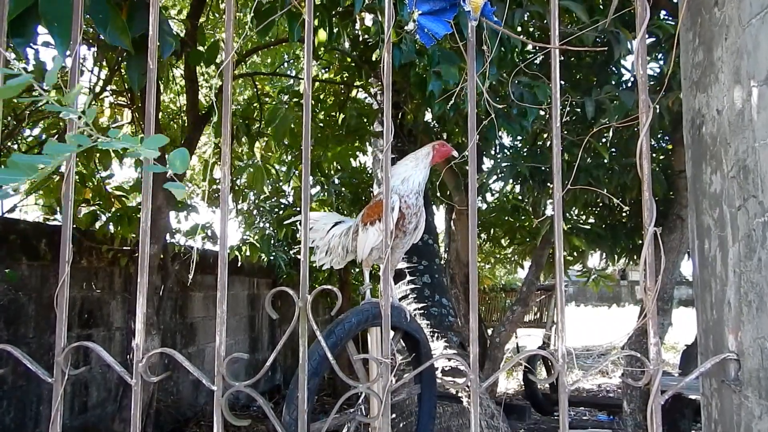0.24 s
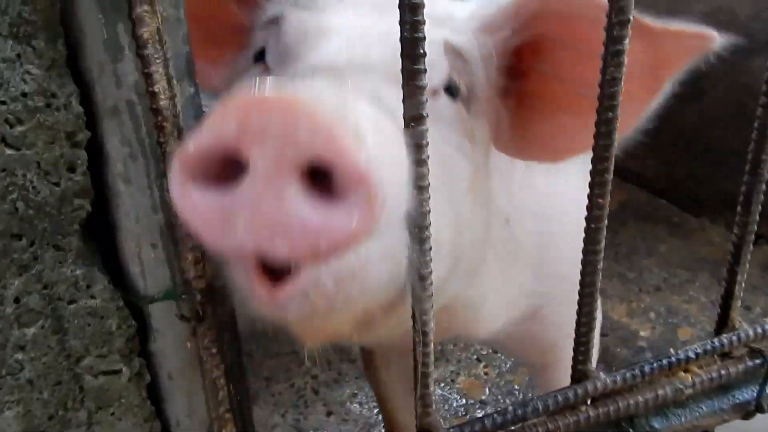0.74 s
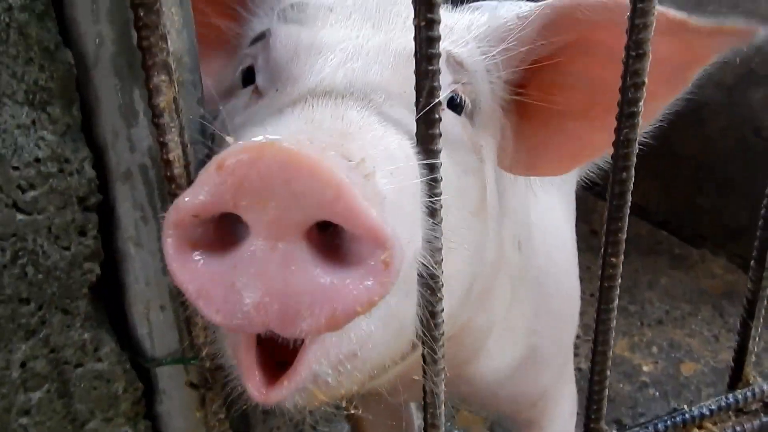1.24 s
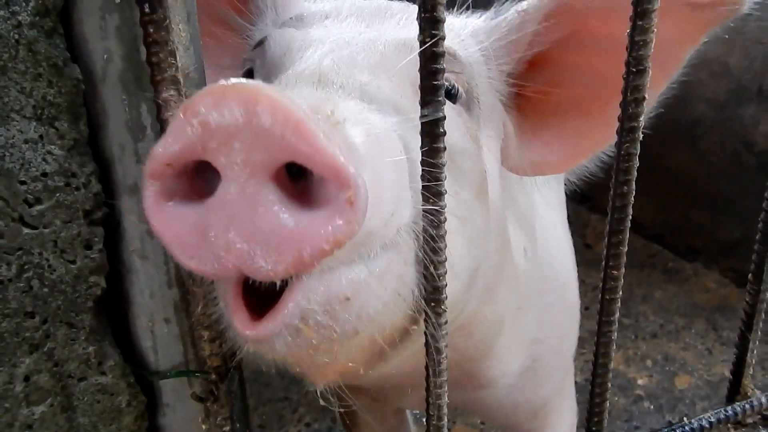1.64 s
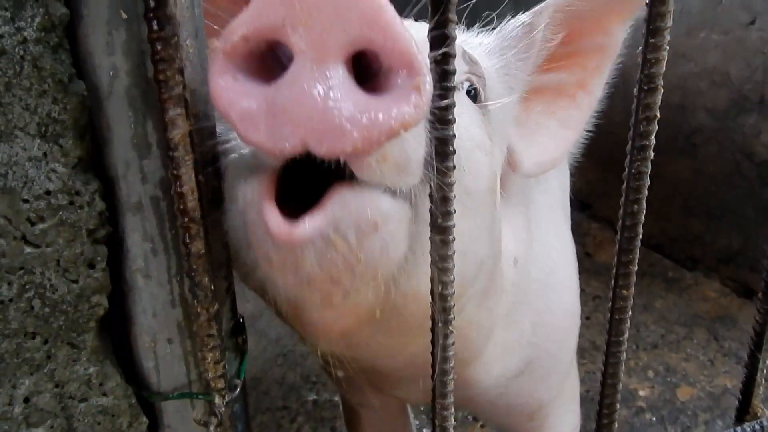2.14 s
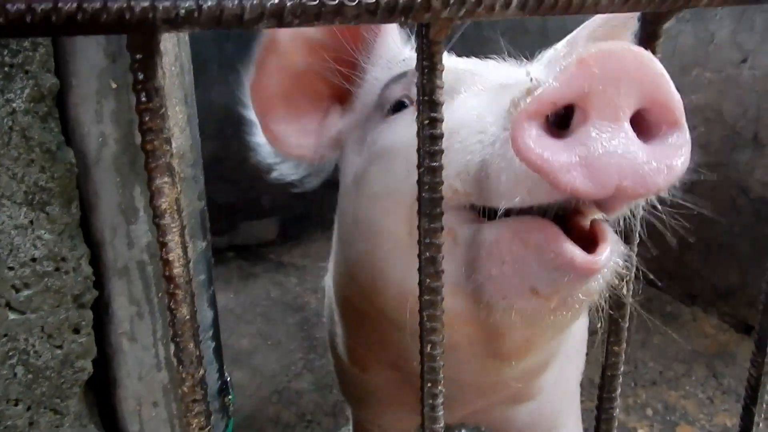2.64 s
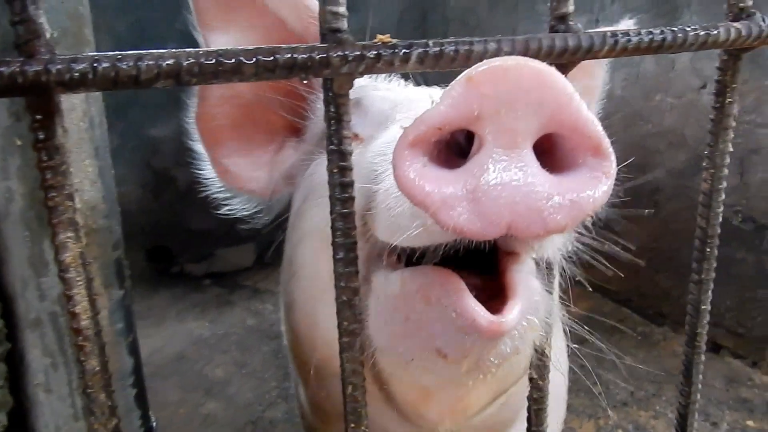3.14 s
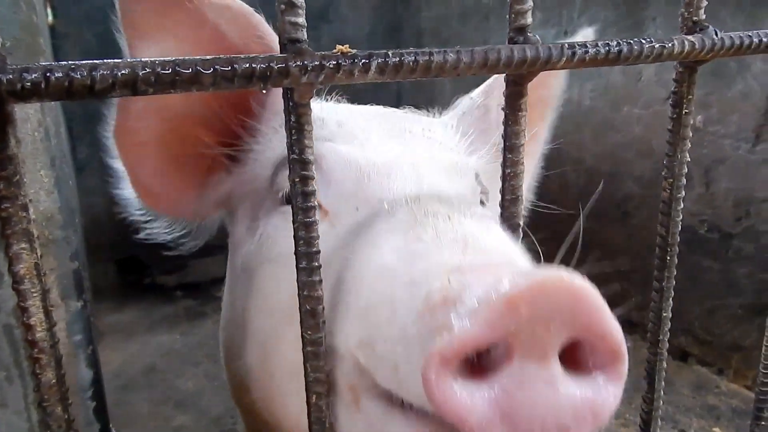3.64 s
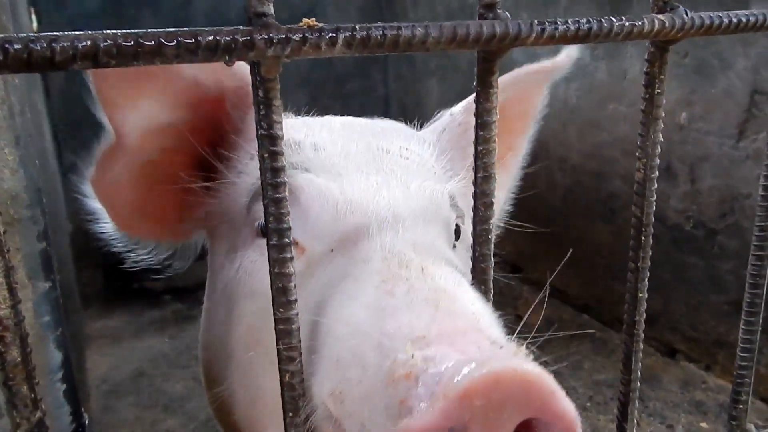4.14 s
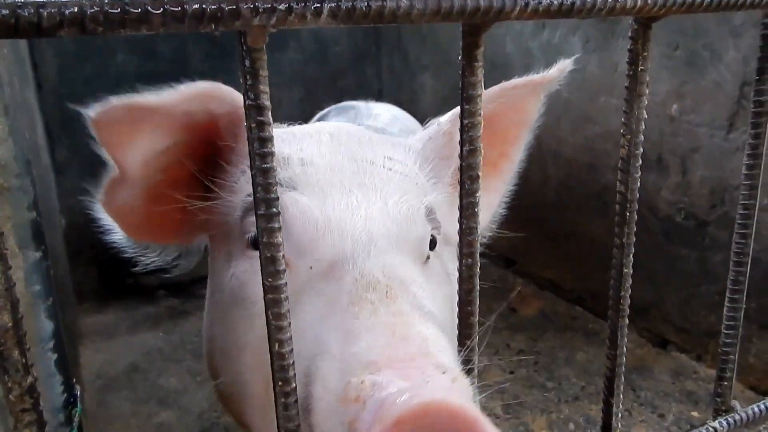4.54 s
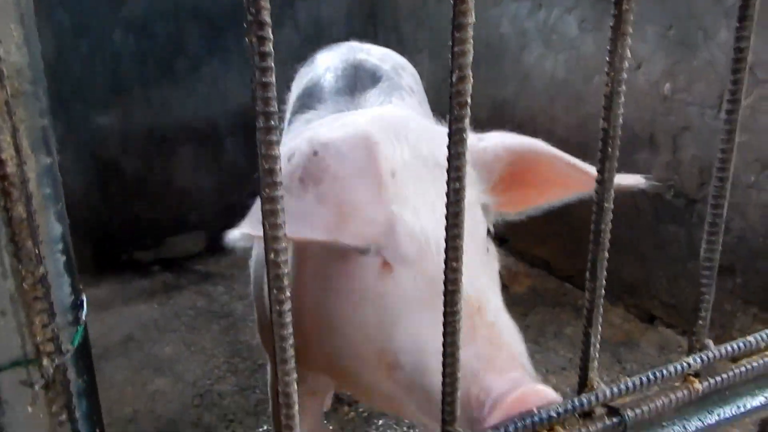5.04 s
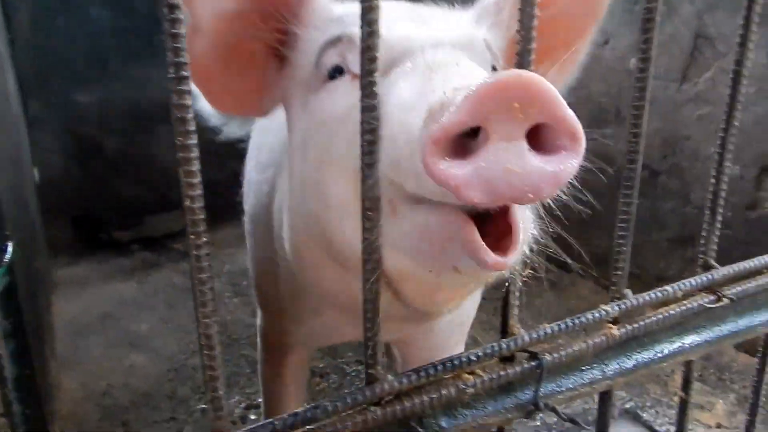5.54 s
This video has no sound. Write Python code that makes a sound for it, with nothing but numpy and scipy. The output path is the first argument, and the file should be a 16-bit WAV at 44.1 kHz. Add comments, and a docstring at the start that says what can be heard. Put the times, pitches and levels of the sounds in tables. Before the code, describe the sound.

A rooster's last held note cracks and stops; abruptly a nearby pig gives a dozen rough, low grunts with wet snuffles in a concrete pen.

```python
"""First, in a yard, the end of a rooster's crow: a sagging harmonic tone that roughens and breaks off. After a
cut, a pig grunts close by in a concrete pen: throat pulses excite resonances of mouth and snout. Most grunts
swell out of a murmur through the snout; then the mouth opens, the push sags, the pulses slow. Between grunts
the pig snuffles, a flutter chopping a hiss; now and then a sharp click or a gulp is heard. Both places add
sparse decaying reflections and a bed of filtered noise."""
import sys
import numpy as np
from scipy import signal
from scipy.fft import rfft, irfft
from scipy.io import wavfile

SR = 44100
rng = np.random.default_rng(int(sys.argv[2]) if len(sys.argv) > 2 else 0)


def output_pcm(signal):
    """Save a mono or channel-first signal as 16-bit PCM at the path in sys.argv[1].

    Samples are clipped to [-1, 1] before scaling.
    """
    pcm = np.clip(np.atleast_2d(signal).T, -1, 1) * 32767
    wavfile.write(sys.argv[1], SR, np.round(pcm).astype(np.int16))


N = 254898
T = np.arange(N) / SR

# grunts: start t/s, hold/s, release/s, effort level/dB, softness of the start/dB, sag over the hold/dB,
# slack in mid-grunt/dB, pulse rate at full effort f/Hz, mouth opening time/s, widest opening (0-1),
# relative brightness/dB, relative rasp/dB
GRUNT_ROWS = [(0.628, .12, .085, -14, 3.5, 10.5, 0.5, 84.5, 0.15, 0.95, -1, -28),
              (.9645, 0.085, 0.067, -15, 4, 11.5, -1, 71, 0.081, 0.88, -1.5, -24.5),
              (1.277, 0.16, .06, -16.5, 3.5, 12, 0.5, 73, 0.042, 0.98, -2.5, -23),
              (1.7086, 0.33, 0.063, -17.5, 8.5, 10.5, 3.5, 72, .12, 0.86, -3.5, -24.5),
              (2.25, .11, .085, -16.5, 6, 8.5, -1, 63, 0.096, 1, -0.5, -21.5),
              (2.67, 0.25, 0.089, -18.5, 10, 7.5, 9, 83.5, 0.056, 0.83, -0.5, -20.5),
              (3.1504, 0.17, .055, -17.5, 8.5, 13, -0.5, 81.6, 0.037, .85, 0.5, -20.5),
              (3.579, .32, 0.042, -19.5, 9, 6, 7, 72, 0.054, 0.89, -1, -24.5),
              (4.139, .26, .055, -21.5, 1, 11.5, 0, 77.75, 0.055, 0.91, 2.5, -23.5),
              (4.658, .3, .06, -23, 5, 5, 6.5, 68, .22, 0.9, 1.5, -22.5),
              (5.37, 0.042, 0.075, -25.5, 0.5, 5, 0, 75.5, 0.054, 0.78, 11, -10.5),
              (5.68, 0.079, 0.088, -20.5, 1.5, 8, -0.5, 79, 0.056, 0.97, 6.5, -19.5)]
# murmurs, mouth nearly shut: start t/s, end t/s, effort level at the end/dB, swell/dB, pulse rate f/Hz,
# relative brightness/dB, relative rasp/dB
MURMUR_ROWS = [(0.612, 0.618, -27.5, -4.5, 62, -17, -26), (0.881, 0.964, -31, 5.5, 50, -8, -21),
               (1.199, 1.255, -31, 3, 57, -7.5, -25), (1.65, 1.702, -28, 10.5, 52, -22, -31),
               (2.169, 2.229, -34.5, -3, 43, -12, -17.5), (2.468, 2.533, -38, -6, 41.6, -10.5, -23.5),
               (2.574, 2.657, -29, 3, 39.3, -8, -32), (3.024, 3.125, -31, 11.5, 41.6, -6, -23),
               (3.56, 3.58, -36.5, -1, 41, -13, -22), (3.974, 4.118, -29, 6, 43, -6.5, -27),
               (4.592, 4.662, -28, 10.5, 59, -21, -45), (4.988, 5.171, -29, 2, 41.2, -11, -23.5),
               (5.261, 5.282, -33, 8.5, 48, -8, -25.5), (5.3, 5.368, -32.5, -7, 72, -10, -28.5),
               (5.554, 5.673, -26.5, 9, 64, -16.5, -30)]
# jolts, where the folds catch and let go with one hard slap: t/s, level over the effort/dB
JOLT_ROWS = [(.923, 8), (1.865, 3.5), (1.901, 3.5), (1.975, 6.5), (2.008, 2.5), (2.725, 5.5), (3.774, 6.5),
             (3.84, 6), (4.114, 5), (4.238, 5), (4.341, 8), (4.75, 5), (4.899, 7.5), (5.735, 4)]
# mouth resonances: f nearly shut/Hz, f wide open/Hz, width/Hz, relative level/dB
MOUTH_MODES = [(265, 463.5, 71.7, -1), (705, 984, 52.7, 0.5), (1180, 1606, 188, -2.5), (1326, 1750, 77, 3),
               (1816, 2327, 114, -2), (2830, 2845, 133, -7.5), (3420, 3710, 170, -14)]
# snout resonances: f/Hz, width/Hz, relative level/dB
SNOUT_MODES = [(234, 21.4, 7), (524.5, 54, 6.5), (828.6, 20.3, 9), (1186, 7.7, -7.5), (1628, 44, 0.5),
               (2063, 91, 3), (2850, 38, -0.5)]
# chest resonance: f/Hz, width/Hz, level over the mean effort/dB
CHEST_MODE = (206, 356, -5.5)
# spectrum of the rasp: f/Hz, gain/dB
RASP_SPECTRUM = [(2500, -31), (3600, -7.5), (4800, 7.5), (5800, 13), (6700, 12.5), (7800, 0)]
# muffling of the pig's voice, a hollow in the middle and little top: f/Hz, gain/dB
MUFFLING = [(2330, -1.5), (2500, -13), (2680, -3), (7400, -1.5), (8300, -1.5), (9300, -18.5), (11000, -31),
            (15000, -38)]
# snuffles: start t/s, end t/s, hiss level/dB, flutter level/dB (both before muffling)
SNUFFLE_ROWS = [(0.84, 0.952, -42, -46), (1.123, 1.245, -35, -43), (1.518, 1.619, -52, -47.5),
                (2.095, 2.222, -43, -51.5), (3.013, 3.142, -41, -48.5), (3.402, 3.541, -48.5, -47),
                (4.035, 4.113, -41, -36), (4.475, 4.612, -55, -49)]
# spectrum of the nostril hiss: f/Hz, relative gain/dB
NOSTRIL_SPECTRUM = [(500, 9.5), (1300, 0), (1850, 13.5), (2400, -1), (3000, 7.5), (4200, -14.5), (5500, -1),
                    (6700, 7), (8000, -11.5), (9500, -11.5)]
# throaty gulps that end a grunt: t/s, relative level/dB
GULP_ROWS = [(2.065, -17), (5.135, -14)]
# sharp wide-band clicks, stronger on the left: t/s, relative level/dB
SNAP_ROWS = [(.982, 1), (0.997, -2), (2.365, -33), (2.751, -30.5), (5.419, -26)]
# the pig swings its head to the right: t/s, left-right level/dB
HEAD_TURN = [(2.2, 0.04), (2.7, -0.33)]
# the pig at the two ports, phase: f/Hz, lead of the left/rad
PIG_PHASE = [(3800, 0.053), (6300, 0.55), (8000, 1.4)]
# the pig at the two ports, balance: f/Hz, left-right level/dB
PIG_BALANCE = [(60, 2), (300, 1.76), (900, 1.64), (1530, 0.9), (2620, 1), (4500, 1.2), (7720, 3)]
# crow: t/s, pitch f/Hz, fundamental level/dB, octave level/dB, fourth harmonic level/dB,
# high overtones level/dB
CROW_TRACK = [(0, 859, -23, -16, -31.5, -25.5), (0.112, 848, -19.5, -15, -35.5, -28.5),
              (0.199, 836.5, -19.5, -19.5, -34.5, -30), (.245, 832, -18.5, -16, -27.5, -39.5),
              (0.299, 821.7, -18, -15, -47.5, -27.5), (0.36, 808.4, -16, -22.5, -48, -29),
              (0.387, 772, -18, -19, -52, -38)]
# where the crow breaks off: start t/s, silent t/s, share the pitch falls to
CROW_BREAK = (.376, 0.408, 0.71)
# high overtones of the crow: multiple of the pitch, relative level/dB
CROW_OVERTONES = [(3, -12.5), (5, -23), (6, -37), (7, 2.5), (8, 0.5), (9, -9.5), (10, -21.5), (11, -39),
                  (13, -41.5), (15, -43)]
# the rooster at the two ports: f/Hz, lead of the left/rad
ROOSTER_PHASE = [(4300, 0.13), (7900, 0.84)]
# reverberation, before each place scales it: f/Hz, 60 dB decay time/s
DECAY_TIMES = [(150, 0.72), (800, 0.24), (2500, 0.12), (8000, 0.14)]
# spectrum of the yard background: f/Hz, relative gain/dB
YARD_AIR = [(18, -57), (30, -14), (86, -2), (328, -11), (500, -18), (1620, -9), (2530, -25), (4340, -29),
            (8170, -37.5), (10600, -85), (18000, -120)]
# spectrum of the pen background: f/Hz, relative gain/dB
PEN_AIR = [(25, -18.5), (55, 2), (85, 8.5), (250, -3.5), (700, -10), (6000, -24), (9000, -47)]

ATTACK_S = 0.031  # time to reach full effort
RELEASE_DB, RELEASE_POWER = 33, 1.5  # how far the release falls, and how it steepens
SLACK_AT, SLACK_WIDTH = .6, .2  # grunts slacken and push again (shares of the hold)
HALF_RATE_DB = 35  # the pulses slow to half when the effort falls this far
SLOW_START, SPEED_UP_S = .2, .02  # the folds start this share slower and catch up
AJAR, OPEN_POWER = .28, 1.41  # opening as a grunt starts (0-1), and how late it gathers speed
OPEN_BRIGHT_DB = 9  # a wide mouth is this much brighter than a shut one
RASP_HOLDS, RASP_LINGERS = 0.8, 0.43  # shares of the sag and release added back to the rasp
MURMUR_RISE_S, MURMUR_FADE_S = 0.011, .013
MURMUR_OPENING = 0.23  # the lips part this far (0-1) by the end
CATCH_S, USUAL_RATE_HZ = .009, 65  # a jolt clears slaps this near; its size suits this pulse rate
YARD_STOPS_S, PEN_STARTS_S = .595, .612


def grunts(puff_s=0.0061, mouth_leak=0.27, snout_leak=0.96, low_air=0.47, high_air=0.46,
           rasp_air=2.67, snout_shuts=0.4, rasp_db=-13):
    """Source and filter: pulses with puffs of air excite the snout and the opening mouth."""
    pulses, effort, opening, bright, rasp = voice()
    oral = np.clip(opening / snout_shuts, 0, 1) * np.pi / 2
    to_mouth, to_snout = np.sin(oral), np.cos(oral)
    # air bursts out with each slap and leaks through in between
    keep = np.exp(-1 / (puff_s * SR))
    bursts = signal.lfilter([np.sqrt(1 - keep ** 2)], [1, -keep], pulses)
    leak = effort * (mouth_leak * to_mouth ** 2 + snout_leak * to_snout ** 2)
    puffs = (bursts + leak) * rng.standard_normal(N)
    # the soft throat changes shape a little from pulse to pulse
    mouth = []
    for shut, wide, width, db in MOUTH_MODES:
        hz = (shut + (wide - shut) * opening) * (1 + .012 * drift(45))
        mouth.append((hz, width, db))
    crispness_db = 1.2 * drift(50)
    low = pulses + low_air * puffs
    high = amp(bright + crispness_db) * (pulses + high_air * puffs)
    out = np.zeros(N)
    for drive, modes in [(low * to_mouth, mouth[:2]), (high * to_mouth, mouth[2:]),
                         (low * to_snout, SNOUT_MODES[:3]), (high * to_snout, SNOUT_MODES[3:])]:
        power = sum(amp(db) ** 2 * np.pi * width / SR for _, width, db in modes)
        for hz, width, db in modes:
            # the resonances' shares wander; a second, wide pole keeps the valleys between them dark
            share_db = db + 1.8 * drift(50)
            out += amp(share_db) * resonate(drive, hz, width, 7 * width) / np.sqrt(power)
    hz, width, db = CHEST_MODE
    chest = resonate(resonate(pulses + puffs, hz, width), hz, width)
    rumble = amp(db) * rms(effort) * unit(chest)
    spit_db = 2.5 * drift(50)
    hiss = colour(amp(rasp + rasp_db + spit_db) * (pulses + rasp_air * puffs), RASP_SPECTRUM)
    return colour(out + rumble + hiss, MUFFLING)


def voice():
    """Superposition: grunts and murmurs share one throat, its shape their effort-weighted mean."""
    tracks = np.zeros((5, N))
    for row in GRUNT_ROWS:
        add(tracks, *grunt(*row))
    for row in MURMUR_ROWS:
        add(tracks, *murmur(*row))
    slaps, effort, *weighted = tracks
    for s, db in JOLT_ROWS:  # each takes the place of the slaps around it
        at = round(s * SR)
        slaps[abs(T - s) < CATCH_S] = 0
        slaps[at] = amp(db) * effort[at] * np.sqrt(SR / USUAL_RATE_HZ)
    return slaps, effort, *(np.array(weighted) / (effort + 1e-9))


def grunt(start, hold_s, release_s, effort_db, soft_db, sag_db, slack_db, top_rate, open_s, widest,
          bright_db, rasp_db):
    """Pressure-driven oscillation: a push swells, sags and lets go, and the pulse rate follows it."""
    t = np.arange(0, hold_s + release_s, 1 / SR)
    held = np.minimum(t / hold_s, 1)
    tired_db = sag_db * held + slack_db * np.exp(-((held - SLACK_AT) / SLACK_WIDTH) ** 2)
    release_db = RELEASE_DB * (np.maximum(t - hold_s, 0) / release_s) ** RELEASE_POWER
    attack_db = soft_db * np.maximum(1 - t / ATTACK_S, 0)
    effort = amp(effort_db - attack_db - tired_db - release_db)
    slowing = .5 ** ((tired_db + release_db) / HALF_RATE_DB)
    rate = top_rate * (1 - SLOW_START * np.exp(-t / SPEED_UP_S)) * slowing
    opening = widest + (AJAR - widest) * np.exp(-(t / open_s) ** OPEN_POWER)
    bright = bright_db - OPEN_BRIGHT_DB * (widest - opening)
    rasp = rasp_db + RASP_HOLDS * tired_db + RASP_LINGERS * release_db
    return start, utterance(rate, effort, opening, bright, rasp)


def murmur(start, end, effort_db, swell_db, rate, bright_db, rasp_db):
    """Nasal radiation: slow, soft pulses leave by the snout as the lips begin to part."""
    t = np.arange(0, end - start + 10 * MURMUR_FADE_S, 1 / SR)
    along = np.minimum(t / (end - start), 1)
    rise = 1 - .5 * np.exp(-t / MURMUR_RISE_S)
    fade = np.exp(-np.maximum(start + t - end, 0) / MURMUR_FADE_S)
    effort = rise * fade * amp(effort_db - swell_db * (1 - along))
    return start, utterance(np.full(len(t), rate), effort, MURMUR_OPENING * along, bright_db, rasp_db)


def utterance(rate, effort, opening, bright_db, rasp_db, jitter_s=.0005, shimmer_db=1.5):
    """Jitter and shimmer: slaps of the folds vary in time and size; effort weights the controls."""
    at = np.flatnonzero(np.diff(np.floor(np.cumsum(rate) / SR), prepend=-1))
    late, size = rng.standard_normal((len(at), 2)).T
    moved = np.clip(at + (jitter_s * late * SR).astype(int), 0, len(rate) - 1)
    slaps = np.zeros(len(rate))
    slaps[moved] = amp(shimmer_db * size) * np.sqrt(SR / rate[at])  # equal power at any rate
    return effort * np.array(np.broadcast_arrays(slaps, 1, opening, bright_db, rasp_db))


def snuffles(flutter_hz=90, unsteady=0.1302, sharpness=3.1, steady_air=0.28):
    """Amplitude modulation: soft tissue flaps in the snout, a low thrum that chops a hiss."""
    angle = 2 * np.pi * np.cumsum(flutter_hz * (1 + unsteady * drift(35))) / SR
    flap = (.5 + .5 * np.cos(angle)) ** sharpness
    hiss = unit((flap + steady_air) * noise(NOSTRIL_SPECTRUM))
    thrum = unit(flap - flap.mean())
    out = np.zeros(N)
    for start, end, hiss_db, thrum_db in SNUFFLE_ROWS:
        swell = np.clip(np.minimum(T - start, end - T) / 0.0034, 0, 1)  # ramps in s
        out += swell * (amp(hiss_db) * hiss + amp(thrum_db) * thrum)
    return out


def gulps(gulp_hz=880, gulp_s=0.011):
    """Damped free vibration: each gulp rings briefly in the throat as a decaying sine."""
    out, t = np.zeros(N), T[:SR // 10]
    for s, db in GULP_ROWS:
        add(out, s, amp(db) * np.sin(2 * np.pi * gulp_hz * t) * np.exp(-t / gulp_s))
    return out


def snaps(snap_s=0.00075, left_db=5):
    """Impulsive excitation: sharp clicks are noise bursts of fast decay, stronger at the left port."""
    out, t = np.zeros(N), T[:SR // 10]
    for s, db in SNAP_ROWS:
        add(out, s, amp(db) * 0.19 * rng.standard_normal(len(t)) * np.exp(-t / snap_s))
    return out * amp([[left_db], [-left_db]])  # left raised, right lowered


def rooster(waver=0.00063, break_rough=0.066, wet_db=-22):
    """Harmonic synthesis: a clean held note of sine partials sags, roughens and breaks off."""
    s, *columns = np.transpose(CROW_TRACK)
    hz, first_db, octave_db, fourth_db, top_db = (np.interp(T, s, c) for c in columns)
    start, end, fall = CROW_BREAK
    breaking = np.clip((T - start) / (end - start), 0, 1)
    roughness = (waver + break_rough * breaking) * drift(360)
    hz = hz * (1 - (1 - fall) * breaking ** 2) * (1 + roughness)
    angle = 2 * np.pi * np.cumsum(hz) / SR
    top = unit(sum(amp(db) * np.sin(round(k) * angle) for k, db in CROW_OVERTONES))
    # a near echo makes the overtones swell in turn as the pitch sags
    top = top + 0.27 * np.interp(T - .005, T, top)
    body = amp(first_db) * np.sin(angle) + amp(octave_db) * np.sin(2 * angle)
    body = body + amp(fourth_db) * np.sin(4 * angle)
    note = np.sqrt(2) * body + amp(top_db) * top
    note = note * (1 - breaking) * (1 + breaking * drift(600))  # the last cycles are ragged
    direct = ports(note, ROOSTER_PHASE, [(800, 0.0022), (7000, 0.0032)])
    return direct + amp(wet_db) * room(note, t60_scale=1.0, delay_s=0.013)


def room(x, t60_scale, delay_s):
    """Reverberation: sparse reflections of random sign; each band dies at its own speed."""
    size = SR // 2
    taps = rng.choice([-1., 1.], (2, size)) * (rng.random((2, size)) < 3000 / SR)  # 3000 a second
    hz, t, z = signal.stft(taps, SR, nperseg=256)
    t60 = t60_scale * read(DECAY_TIMES, hz)[:, None]
    tail = signal.istft(z * amp(-60 * t / t60), SR, nperseg=256)[1]
    tail = np.pad(tail, ((0, 0), (round(delay_s * SR), 0)))
    mid, side = signal.fftconvolve(x[None], tail / np.linalg.norm(tail[0]), axes=1)[:, :N]
    # close ports: long waves arrive alike
    side = colour(side, [(200, -38.5), (1500, -7.5), (6000, 2)])
    return np.array([mid + side, mid - side])


def air(spectrum, db, side_db):
    """Partial coherence: a distant noise background, nearly the same on both sides."""
    return amp(db) * (noise(spectrum) + amp(side_db) * noise(spectrum) * np.array([[1], [-1]]))


def ports(x, phase, balance):
    """Interaural-type cues: two microphone ports hear one source in different phase and level."""
    hz = np.fft.rfftfreq(N, 1 / SR)
    lean = amp(read(balance, hz) / 2) * np.exp(.5j * read(phase, hz))
    return irfft(rfft(x) * np.array([lean, 1 / lean]), N)


def resonate(x, hz, *widths):
    """Resonance: a damped sine after each pulse, at a movable pitch; more widths steepen its skirts."""
    turn = np.exp(2j * np.pi * np.cumsum(hz * np.ones(N)) / SR)
    x = x * turn.conj() + 1e-18
    for r in np.exp(-np.pi * np.array(widths) / SR):
        x = signal.lfilter([1 - r], [1, -r], x)
    return 2 * (turn * x).real


def colour(x, spectrum):
    """Minimum-phase filtering: a causal filter with the given spectrum."""
    log_gain = np.log(amp(read(spectrum, abs(np.fft.fftfreq(4096, 1 / SR)))))
    taps = np.fft.ifft(np.exp(np.conj(signal.hilbert(log_gain)))).real
    return signal.oaconvolve(x, taps[:len(taps) // 2])[:len(x)]


def noise(spectrum):
    """Filtered white noise of rms 1."""
    return unit(colour(rng.standard_normal(N), spectrum))


def drift(hz):
    """Band-limited randomness: noise below the given frequency, of rms 1."""
    return unit(irfft(rfft(rng.standard_normal(N)) * (np.fft.rfftfreq(N, 1 / SR) < hz), N))


def read(points, hz):
    """Logarithmic frequency scale: interpolate a table along it."""
    f, value = np.transpose(points)
    return np.interp(np.log(hz + 1), np.log(f + 1), value)


def amp(db):
    """Level law: decibels to amplitude ratio."""
    return 10 ** (np.asarray(db) / 20)


def rms(x):
    """Effective value: root of the mean square."""
    return np.sqrt(np.mean(x ** 2) + 1e-20)


def unit(x):
    """Normalization to rms 1."""
    return x / rms(x)


def add(mix, s, sound):
    """Linear superposition: add a sound to the mix from time s on."""
    part = mix[..., max(round(s * SR), 0):][..., :sound.shape[-1]]
    part += sound[..., :part.shape[-1]]


def scene():
    """Superposition of direct sound, reflections and background: the yard until the cut, then the pen."""
    yard = rooster() + air(YARD_AIR, -43, side_db=-14)
    pig = grunts() + colour(snuffles(), MUFFLING) + gulps()
    walls = amp(-12) * room(pig, t60_scale=.8, delay_s=.003)
    facing = amp(np.interp(T, *np.transpose(HEAD_TURN)) * np.array([[.5], [-.5]]))
    direct = facing * ports(pig, PIG_PHASE, PIG_BALANCE)
    pen = direct + walls + snaps() + air(PEN_AIR, -53, side_db=-11)
    return yard * (T < YARD_STOPS_S) + pen * (T > PEN_STARTS_S)


def record(dry):
    """Transducer limits: the microphone sheds deep bass, the sharpest peaks clip; then the band limit."""
    thinned = signal.sosfilt(signal.butter(2, 50, "high", fs=SR, output="sos"), dry)
    clipped = np.clip(thinned, -.66, .66)
    band_limit = signal.firwin(511, 15800, window=("kaiser", 9), fs=SR)  # cutoff in Hz
    return signal.oaconvolve(clipped, band_limit[None], "same")


dry = scene()
out = record(dry)
output_pcm(out)
```